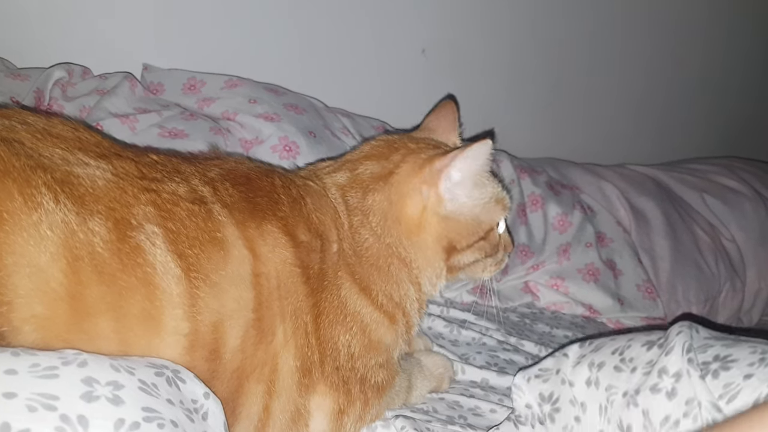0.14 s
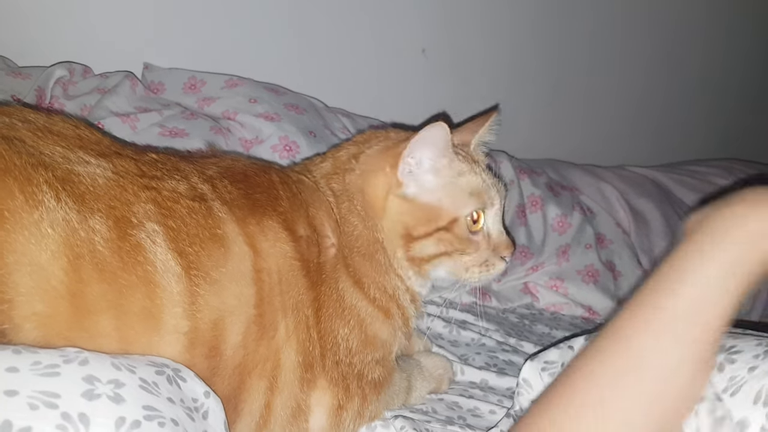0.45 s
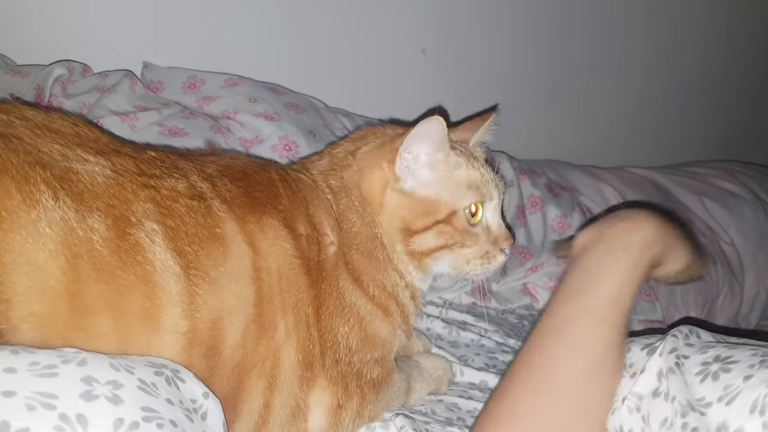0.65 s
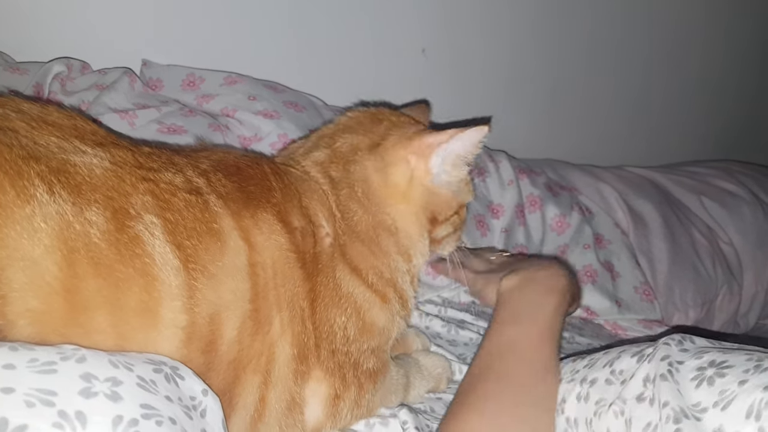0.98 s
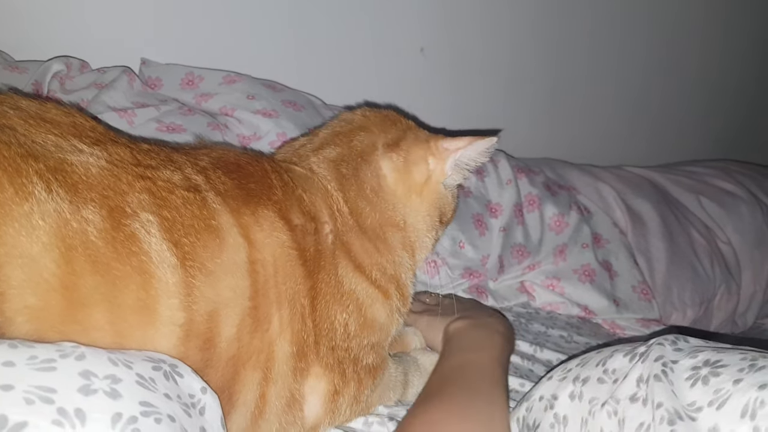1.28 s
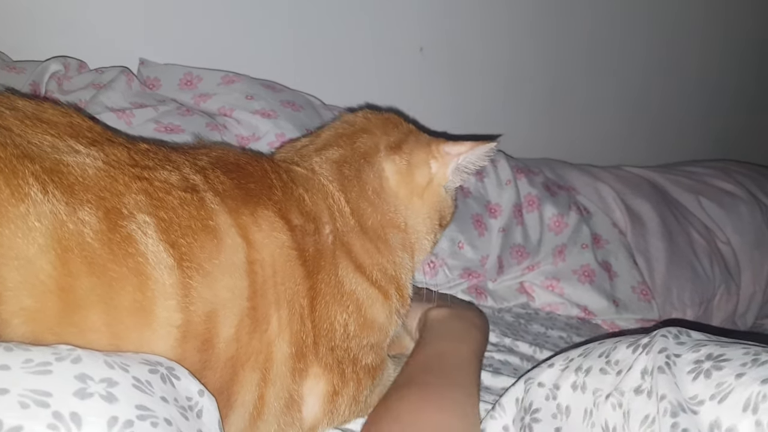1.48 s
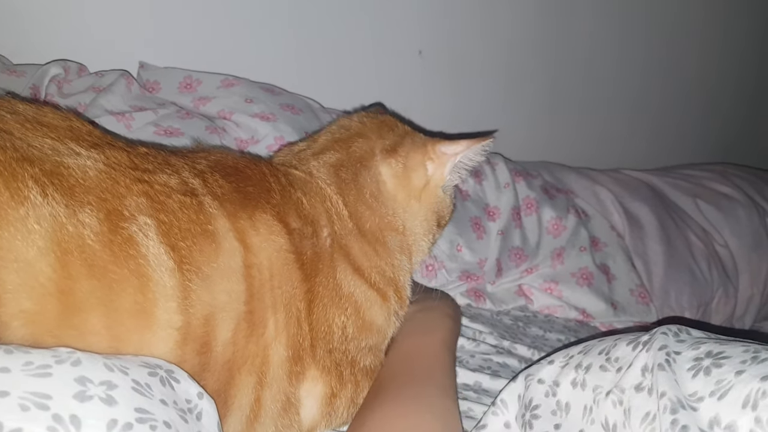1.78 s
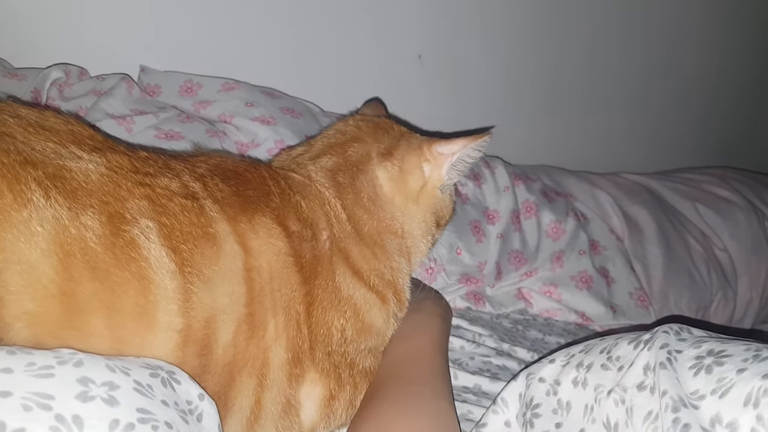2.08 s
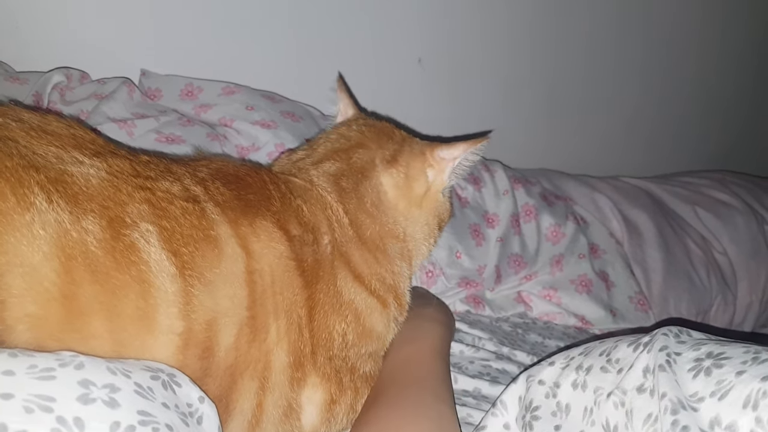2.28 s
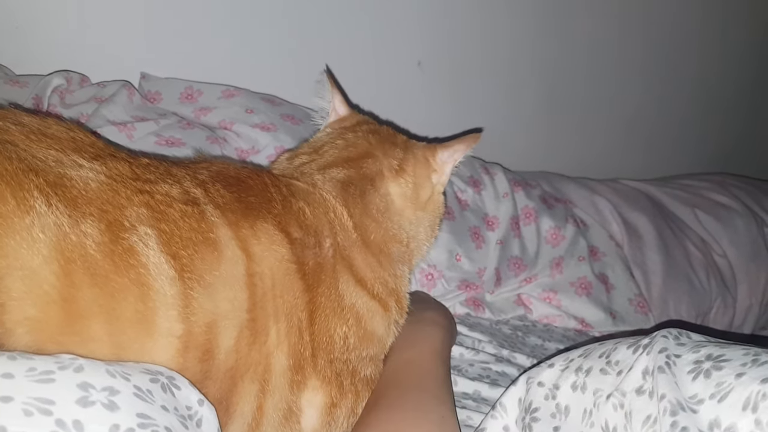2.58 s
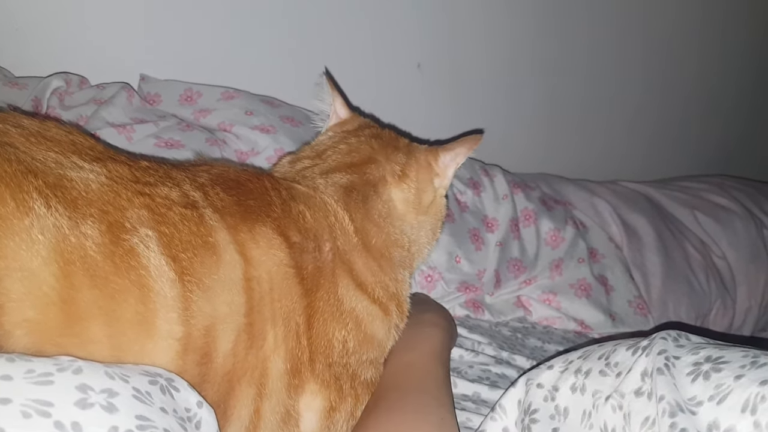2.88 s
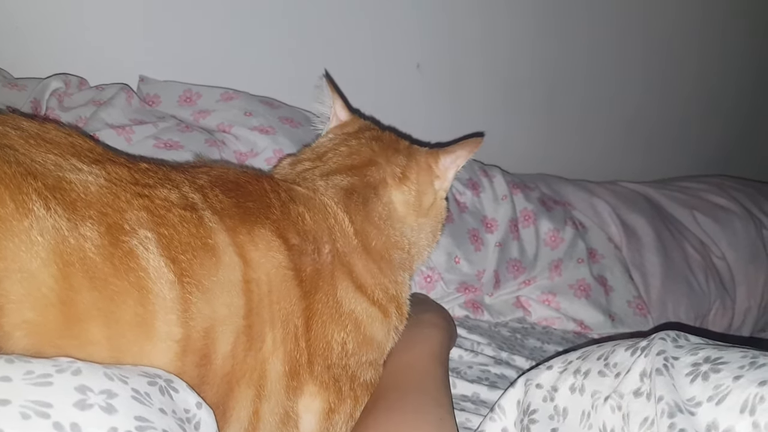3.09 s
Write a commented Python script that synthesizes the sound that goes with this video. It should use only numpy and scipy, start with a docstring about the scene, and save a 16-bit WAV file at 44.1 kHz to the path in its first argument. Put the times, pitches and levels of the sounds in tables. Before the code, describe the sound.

A cat purrs continuously very close to the microphone in a small quiet room, low and fluttering, slowly quickening; an arm brushes the bedding with soft dull bumps, then fingers faintly rub fur over steady hiss.

```python
"""Cat purring in a small quiet room

A cat purrs close by on a bed, quickening as its chin is scratched. Its larynx snaps open and shut about
forty times a second; these pulses and the air that flutters with them excite the resonances of the body.
An arm brushes the bedding with soft bumps, fingers rub the fur and something ticks once: shaped noise and
short swings. Drifting sines make a thin whine; filtered noise makes a nasal whistle, a rumble and a hiss."""
import sys
import numpy as np
from scipy import signal
from scipy.fft import rfft, irfft
from scipy.io import wavfile
from scipy.ndimage import uniform_filter1d

SR = 44100
rng = np.random.default_rng(int(sys.argv[2]) if len(sys.argv) > 2 else 0)


def generate_wav(signal):
    """Clip the signal to [-1, 1] and save it as 16-bit WAV at the path in sys.argv[1]."""
    frames = np.transpose(np.atleast_2d(signal))
    scaled = np.clip(frames, -1, 1) * 32767
    pcm = np.round(scaled).astype(np.int16)
    wavfile.write(sys.argv[1], SR, pcm)


N = 143325

# pulse rate of the larynx: (time [s], rate [Hz])
PULSE_RATE = [(0.0, 34.4), (0.08, 34.7), (0.23, 34.8), (0.51, 36.3), (0.65, 36.1), (0.8, 36.3),
              (0.88, 36.8), (1.1, 37.4), (1.32, 38.2), (1.79, 39.1), (1.93, 39.7), (2.08, 39.7),
              (2.23, 42.4), (2.38, 40.6), (2.58, 40.7), (2.87, 42.3), (3.25, 42.4)]
# unevenness of the pulses and share of fluttering air: (time [s], roughness [0-1])
ROUGHNESS = [(0, 0.12), (.3, 0.3), (.6, 0.24), (1.0, 0.58), (1.3, 0.33), (1.7, 0.22), (2.1, 0.25),
             (2.25, 0.2), (2.45, 0.3), (2.8, 0.3), (3.0, 0.25), (3.25, 0.2)]


def purr():
    """Source and filter: pulses and turbulent air ring body resonances, each register with its own level."""
    # resonances of the body: (centre [Hz], width [Hz], level within the register [dB])
    fundamental_modes = [(38.9, 23, 0)]
    chest_modes = [(68.4, 42, 0.2), (117.7, 15, 1)]
    throat_modes = [(161, 44, 1), (260.5, 41, -3.3)]
    buzz_modes = [(352, 72, 1.5), (407, 62, 0)]
    # lower registers: (time [s], fundamental level before trim [dB], chest level before trim [dB])
    bass = [(0.02, -58, -45), (0.14, -68, -42.5), (0.19, -51, -40.5), (0.3, -60, -39), (0.63, -50, -42),
            (0.66, -53, -45), (1.37, -45, -38), (1.45, -53, -39.5), (1.59, -38, -38.5), (1.93, -36, -41.5),
            (2.17, -34.5, -38), (2.3, -40, -43), (2.43, -42, -38), (2.59, -38, -46), (2.71, -44.5, -42.5),
            (2.91, -39.5, -42.5), (3.02, -39.5, -44.5), (3.22, -51, -43)]
    # upper registers: (time [s], throat level before trim [dB], buzz level before trim [dB])
    upper = [(0.02, -47, -50), (0.06, -47, -69), (0.12, -46, -51.5), (0.32, -46.5, -53.5), (0.95, -46, -49),
             (0.99, -40, -50), (1.09, -52, -63), (1.11, -51, -47), (1.27, -42.5, -51.5), (1.31, -48.5, -50),
             (1.75, -45, -55), (1.89, -44, -48), (1.94, -41, -57.5), (2.23, -44.5, -51.5),
             (2.28, -41, -52.5), (3.02, -46.5, -46), (3.18, -55, -47.5), (3.22, -41, -53)]
    # rasp above the purr: (time [s], level [dB])
    rasp_level = [(0, -57.5), (.9, -58), (1.6, -60), (2.6, -65.5), (3.25, -90)]
    # fundamental, chest, throat, buzz: trim of the level, and how late each answers a pulse
    trim_db = (-4, 0.5, 2.5, 0.1)
    lag_s = (.0035, 0, .0035, .008)
    edges_hz = (20, 55, 135, 305, 600)  # bounds between the registers

    cycles = np.cumsum(curve(PULSE_RATE)) / SR
    pulses, gate = larynx(cycles)
    drive = pulses + curve(ROUGHNESS) * gate * rng.standard_normal(N)
    registers = fundamental_modes, chest_modes, throat_modes, buzz_modes
    levels = curve(bass), curve(bass, axis=2), curve(upper), curve(upper, axis=2)
    body = np.zeros(N)
    for k, modes in enumerate(registers):
        rung = steady(sum(undb(db) * ring(drive, hz, width) for hz, width, db in modes))
        voiced = steady(rung + overtones(cycles, edges_hz[k], edges_hz[k + 1]))
        late = np.roll(voiced, int(lag_s[k] * SR))
        body += late * undb(levels[k] + trim_db[k])
    body_low_pass = signal.butter(4, 513, fs=SR, output="sos")
    body = signal.sosfiltfilt(body_low_pass, body)
    rasp = unit(ring(gate * rng.standard_normal(N), hz=690, width_hz=600))
    return room(body + undb(curve(rasp_level)) * rasp)


def larynx(cycles):
    """Pulsed flow: each cycle has an opening pulse, a weaker closing pulse and a decaying puff of air."""
    jitter, shimmer_db = 0.038, 3.5  # spread at roughness 1: fraction of a period, dB
    close_at, close_wander = 0.358, 0.044  # fractions of a period after opening
    close_db, puff_decay = -7, 1  # closing relative to opening [dB], decay time [periods]

    rate, rough = curve(PULSE_RATE), curve(ROUGHNESS)
    closing_place = close_at + close_wander * walk(5)
    pulses, gate = np.zeros(2 * N), np.zeros(2 * N)
    beats = np.searchsorted(cycles, np.arange(cycles[-1]))  # samples at which the cycles begin
    for i, (shift, size, closing) in zip(beats, rng.standard_normal((200, 3))):
        period = SR / rate[i]
        start = abs(i + int(period * jitter * rough[i] * shift))
        strength = undb(shimmer_db * rough[i] * size)
        pulses[start] += strength
        close = start + int(period * abs(closing_place[i]))
        pulses[close] -= strength * undb(close_db + shimmer_db * rough[i] * closing)
        age = np.arange(int(2 * period))
        gate[start + age] += strength * np.exp(-age / period / puff_decay)
    return unit(pulses[:N]), unit(gate[:N])


def overtones(cycles, low_hz, high_hz):
    """Harmonicity: exact multiples of the pulse rate swell and fade within one register."""
    # overtones that sing out: (start [s], end [s], nearby frequency [Hz], level over the ringing [dB])
    singing = [(0, 0.245, 277, -0.5), (0, 0.207, 208, 2), (0.038, 0.595, 70, -4), (0.093, 0.326, 244, -0.5),
               (0.182, 0.706, 180, -4.5), (0.3, 0.6, 214, 2.5), (0.401, 1.456, 111, -1),
               (0.69, 0.922, 254, -1.5), (0.807, 1.026, 368, 3), (0.876, 1.42, 225, 14),
               (0.998, 1.225, 414, 4.5), (1.11, 2.657, 78, 2), (1.272, 1.52, 418, 1),
               (1.478, 1.945, 234, -16.5), (1.505, 2.354, 117, -2), (1.74, 2.456, 160, -5),
               (1.79, 2.04, 435, -2), (2.332, 2.642, 243, -4.5), (2.367, 2.702, 204, 3),
               (2.557, 3.196, 166, -5.5), (2.596, 3.23, 378, 0.5), (2.504, 3.25, 251, 1.5),
               (2.674, 2.983, 125, 7), (2.717, 3.212, 296, 9), (2.803, 3.05, 423, 8),
               (2.827, 3.085, 465, 3.5), (2.836, 3.03, 508, 0)]
    t, rate, out = np.arange(N) / SR, curve(PULSE_RATE), np.zeros(N)
    for start, end, hz, db in singing:
        if low_hz <= hz < high_hz:
            multiple = round(hz / np.interp((start + end) / 2, t, rate))
            swell = np.sin(np.pi * np.clip((t - start) / (end - start), 0, 1))
            out += np.sqrt(2) * undb(db) * swell * np.cos(2 * np.pi * multiple * cycles)
    return out


def room(x):
    """Arrival delay and reverberation: the right port hears first; a short diffuse tail follows."""
    t60_s, tail_db, port_lag_s = 0.095, -14.5, 0.00033
    t = np.arange(SR // 2) / SR
    tail = rng.standard_normal((2, len(t))) * np.exp(-np.log(1000) * t / t60_s)
    tail /= np.sqrt(np.sum(tail ** 2, axis=1, keepdims=True))
    late = np.interp(np.arange(N) - port_lag_s * SR, np.arange(N), x)
    direct = np.array([late, x]) * pan(0.6)
    return direct + undb(tail_db) * signal.fftconvolve(x[None], tail, axes=1)[:, :N]


def nose():
    """Narrow-band turbulence: a faint airy whistle, probably of the cat's nose."""
    # whistle: (time [s], centre [Hz], level [dB])
    whistle = [(.7, 2130, -82), (1.07, 2140, -69), (1.2, 2140, -73), (1.4, 2020, -68), (1.5, 2080, -72),
               (1.73, 1880, -70), (1.87, 2280, -69), (2.02, 2320, -72), (2.13, 2290, -69), (2.3, 2245, -68),
               (2.57, 2300, -71), (2.8, 2315, -67), (3.12, 2315, -68), (3.2, 2315, -82)]
    return airy(whistle, width_hz=58, wander_hz=10.12, patchy_db=3)


def hand():
    """Friction noise: an arm slides over bedding, fingers and palm rub the fur; one faint tick decays."""
    # strokes over the bedding: (start [s], length [s], level [dB])
    strokes = [(-0.02, 0.37, -69), (0.263, 0.51, -66.5), (1.146, 0.51, -73)]
    # spectrum of the cloth: (frequency [Hz], relative density [dB per Hz])
    cloth_spectrum = [(700, -14), (2500, -28), (6000, 11), (9000, 5), (12000, 7), (15500, -4)]
    # fingers in the fur: (time [s], centre [Hz], level [dB])
    fingers = [(0, 2820, -74), (.55, 2700, -68), (.8, 2500, -74), (1.12, 2700, -66), (1.38, 2550, -64),
               (1.6, 2600, -68), (1.88, 2400, -65.5), (2.03, 2400, -68), (2.13, 2350, -63.5),
               (2.24, 2400, -69), (2.36, 2400, -61.5), (2.44, 2450, -66), (2.68, 2600, -67),
               (2.77, 2620, -60.5), (2.85, 2600, -67), (3.25, 2706, -66)]
    # duller rub of the hand under the chin: (time [s], level [dB])
    rub_level = [(0, -72), (.9, -68.5), (1.35, -60), (1.65, -83), (3.05, -66), (3.2, -62.5)]
    tick_s, tick_decay_s, tick_db = 1.957, .002, -68

    t = np.arange(N) / SR
    swell = np.zeros(N)
    for start, length, db in strokes:
        swell += undb(db) * np.sin(np.pi * np.clip((t - start) / length, 0, 1))
    cloth = swell * undb(1.4 * walk(33.3)) * colour(rng.standard_normal((2, N)), cloth_spectrum)
    fur = airy(fingers, width_hz=404, wander_hz=49.63, patchy_db=4)
    tick_noise = unit(ring(rng.standard_normal((2, N)), hz=5200, width_hz=4080))
    tick = (t >= tick_s) * np.exp(-abs(t - tick_s) / tick_decay_s) * tick_noise
    palm_noise = unit(ring(rng.standard_normal((2, N)), hz=1460, width_hz=420))
    palm = undb(curve(rub_level)) * palm_noise
    return cloth + fur + palm + undb(tick_db) * tick


def thumps():
    """Heavily damped oscillation: each soft, low bump is little more than one swing."""
    # bumps: (time of the centre [s], level of the envelope's top [dB])
    bumps = [(0.685, -32), (0.756, -32), (0.82, -43), (0.888, -31), (0.942, -29.5), (1.022, -31),
             (1.087, -38), (1.143, -27), (1.236, -30.5), (2.879, -38.5), (2.96, -46), (3.06, -39),
             (3.131, -40)]
    swing_hz, spread_s = 68.3, 0.0062
    t, out = np.arange(N) / SR, np.zeros(N)
    for at, db in bumps:
        envelope = np.exp(-.5 * ((t - at) / spread_s) ** 2)
        out += undb(db) * envelope * np.sin(2 * np.pi * swing_hz * (t - at))
    return out


def whine():
    """Frequency and amplitude modulation: thin high tones waver and grow; now and then one flares up."""
    # standing tones: (frequency [Hz], level before the common gain [dB])
    tones = [(3715, -74), (3763, -75), (4054, -79), (4077, -74), (4095, -77), (5104, -75.5), (5597, -75),
             (6585, -79), (6665, -81)]
    # common gain of the standing tones: (time [s], gain [dB])
    tone_gain = [(0, -12), (1.3, -6.5), (2.2, -9), (2.6, -3), (2.85, -3), (3.1, 4.5), (3.25, -10)]
    # flares: (time of the centre [s], spread [s], frequency [Hz], level at the centre [dB])
    flares = [(.605, .02, 6600, -74), (.96, .03, 5104, -76), (1.21, .05, 4060, -74),
              (1.55, .08, 3740, -74.5), (1.73, .025, 5104, -75), (2.0, .1, 3720, -71.5),
              (2.22, .02, 5610, -75), (2.45, .02, 4075, -67), (2.62, .06, 5597, -75),
              (2.695, .02, 4085, -66), (2.72, .02, 5115, -69), (2.74, .02, 6690, -75),
              (2.97, .02, 4090, -69), (2.99, .03, 5095, -74), (3.11, .025, 5070, -69),
              (3.125, .04, 3745, -72), (3.13, .065, 4085, -66)]
    tone_drift_hz, tone_flicker_db = 2.883, 3.5
    flare_drift_hz, flare_flicker_db = 12, 2.5

    t, out = np.arange(N) / SR, np.zeros((2, N))
    for hz, db in tones:
        phase = 2 * np.pi * np.cumsum(hz + tone_drift_hz * walk(25.37)) / SR
        level_db = db + curve(tone_gain) + tone_flicker_db * walk(15)
        for side in out:  # the phase wanders separately at each port
            side += np.sqrt(2) * undb(level_db) * np.sin(phase + .5 * walk(2.7))
    for at, spread, hz, db in flares:
        phase = 2 * np.pi * np.cumsum(hz + flare_drift_hz * walk(60)) / SR
        envelope = np.exp(-.5 * ((t - at) / spread) ** 2)
        swell = undb(db + flare_flicker_db * walk(40.24)) * envelope
        for side in out:
            side += np.sqrt(2) * swell * np.sin(phase + .5 * walk(20))
    return out


def rumble():
    """Partly coherent noise: the bed and the hand-held microphone rumble, mostly alike at both ports."""
    # spectrum: (frequency [Hz], relative density [dB per Hz])
    rumble_spectrum = [(25, -60), (35, -24), (46, -13.5), (56, -6.5), (70, -12.5), (95, -15), (140, -9),
                       (180, -14.5), (300, -17.5), (500, -29), (1000, -56.5), (4000, -91)]
    # slow change: (time [s], gain [dB])
    rumble_gain = [(0, 1.5), (.6, 0), (.95, 0), (1.3, 2), (1.7, -3.5), (2.05, 0), (2.25, 0), (2.6, -2.5),
                   (2.9, 5), (3.25, -1)]
    base_db, side_db = -44, -10  # side: unshared noise relative to the shared noise
    noise = rng.standard_normal(N) + undb(side_db) * rng.standard_normal((2, N))
    return undb(base_db + curve(rumble_gain)) * colour(noise, rumble_spectrum)


def hiss():
    """Nearly incoherent noise: the room's steady hiss is mostly unlike at the two ports."""
    # spectrum: (frequency [Hz], relative density [dB per Hz])
    hiss_spectrum = [(320, -14), (550, -0.5), (836, -10), (962, -3.5), (1050, -5.5), (1780, -7.5),
                     (2290, -4.5), (3380, -8.5), (4170, -9), (4600, -12), (5000, -9.5), (5360, -12.5),
                     (5590, -12), (5910, -14), (6800, -13.5), (8270, -33.5), (15500, -28.5)]
    likeness = 0.13  # amplitude of the shared noise relative to the unshared
    noise = rng.standard_normal((2, N)) + likeness * rng.standard_normal(N)
    return undb(-56) * colour(noise, hiss_spectrum)


def airy(rows, width_hz, wander_hz, patchy_db):
    """Ring modulation: low-passed noise on a moving carrier follows (time [s], centre [Hz], level [dB])."""
    low_pass = signal.butter(2, width_hz / 2, fs=SR, output="sos")
    noise = signal.sosfilt(low_pass, rng.standard_normal((2, N)))
    carrier = np.sin(2 * np.pi * np.cumsum(curve(rows) + wander_hz * walk(14)) / SR)
    return unit(noise * carrier) * undb(curve(rows, axis=2) + patchy_db * walk(18))


def ring(x, hz, width_hz):
    """Zero-phase resonance: one band-pass run forward and backward keeps pulses compact."""
    b, a = signal.iirpeak(hz, hz / (1.55 * width_hz), fs=SR)  # widened, as two passes narrow the band
    return signal.filtfilt(b, a, x, padtype=None)


def colour(x, points):
    """Spectral shaping by (frequency [Hz], level [dB]) points, falling away below the lowest; rms 1."""
    hz, db = np.array(points, float).T
    f = np.fft.rfftfreq(N, 1 / SR) + 1  # 1 Hz up, so that the logarithm exists
    gain = undb(np.interp(np.log(f), np.log(hz), db)) * np.minimum(f / hz[0], 1)
    return unit(irfft(rfft(x) * gain, N))


def steady(x):
    """Automatic gain: hold the running rms, over about a tenth of a second, near 1."""
    power = uniform_filter1d(uniform_filter1d(x ** 2, size=4410), size=4410)
    return x / np.sqrt(power + 1e-12)


def walk(rate):
    """Smoothed random modulation: levels held 1 / rate seconds and slewed twice; spread near 1."""
    k = int(SR / rate)
    held = np.repeat(rng.standard_normal(256), k)[:N]
    return 1.407 * uniform_filter1d(uniform_filter1d(held, k), k)


def curve(rows, axis=1):
    """Linear interpolation in time of one column of a table."""
    rows = np.array(rows, float)
    return np.interp(np.arange(N) / SR, rows[:, 0], rows[:, axis])


def pan(db):
    """Level difference between the ears: left and right gains, left louder for positive dB."""
    return undb(np.array([[db], [-db]]) / 2)


def undb(db):
    """Decibel law: amplitude ratio of a level in dB."""
    return 10 ** (np.asarray(db) / 20)


def unit(x):
    """Root-mean-square normalisation: scale to rms 1."""
    return x / np.sqrt(np.mean(x ** 2))


def scene():
    """Superposition: the low sounds ease in and out over the high ones, which lean to the right."""
    fade_s = .012
    t = np.arange(N) / SR
    ease = np.sin(np.pi / 2 * np.minimum(np.minimum(t, t[::-1]) / fade_s, 1)) ** 2
    low_cut = signal.butter(6, 31, "high", fs=SR, output="sos")
    low = signal.sosfiltfilt(low_cut, purr() + rumble() + thumps())
    high = hiss() + whine() + hand() + nose()
    return ease * low + high * pan(-4)


def record(dry):
    """Band limiting: a steep elliptic low-pass cuts the top above 15.75 kHz."""
    top_cut = signal.ellip(12, .1, 80, 15750, fs=SR, output="sos")
    return signal.sosfilt(top_cut, dry)


dry = scene()
out = record(dry)
generate_wav(out)
```